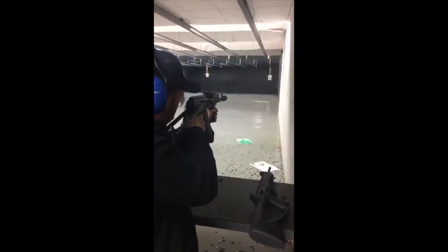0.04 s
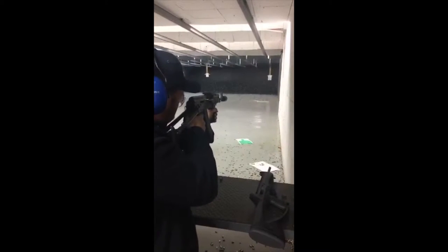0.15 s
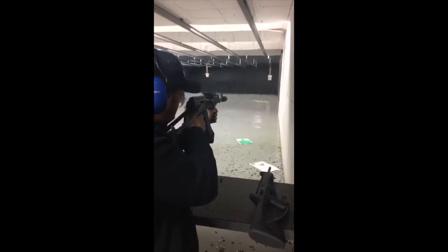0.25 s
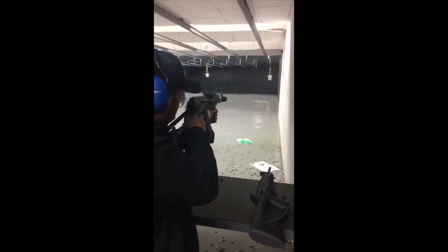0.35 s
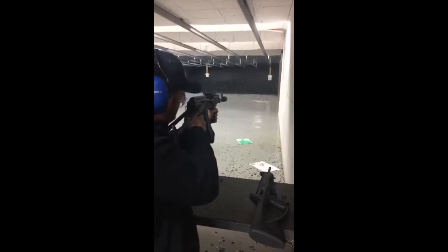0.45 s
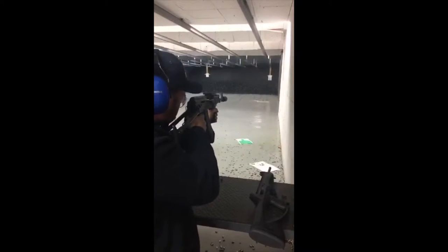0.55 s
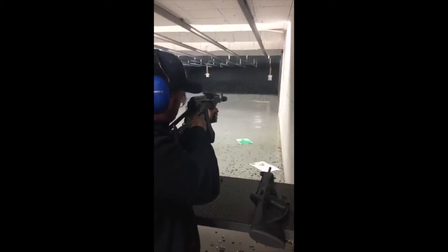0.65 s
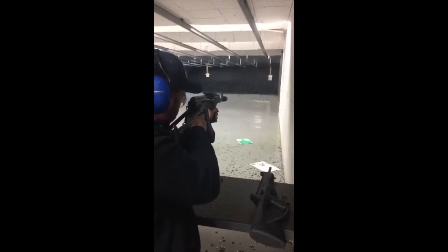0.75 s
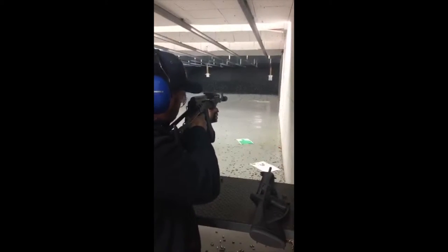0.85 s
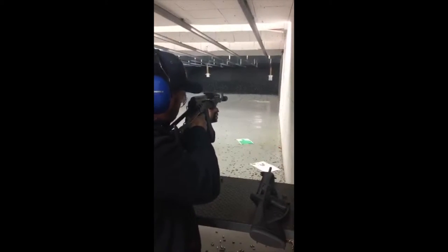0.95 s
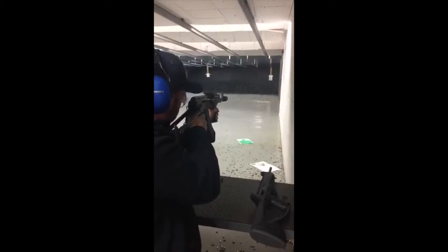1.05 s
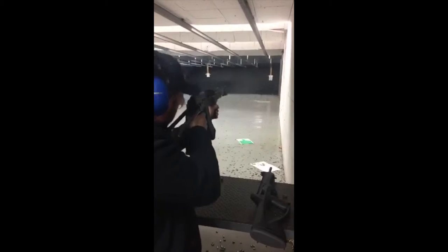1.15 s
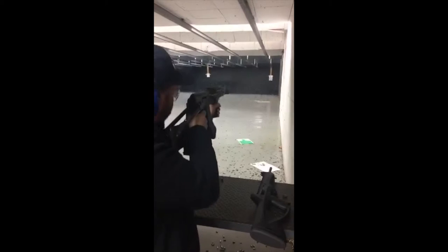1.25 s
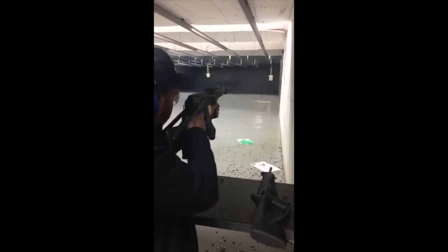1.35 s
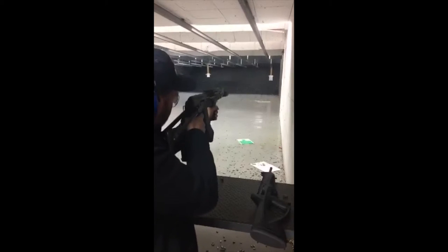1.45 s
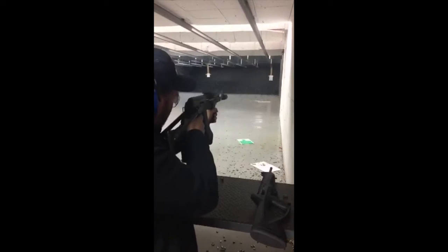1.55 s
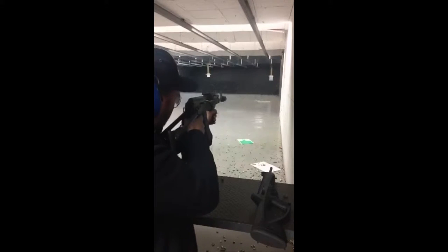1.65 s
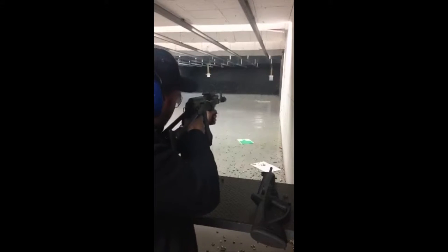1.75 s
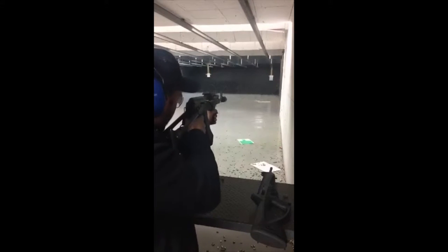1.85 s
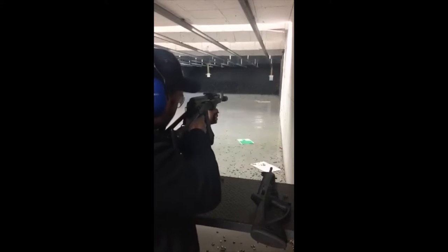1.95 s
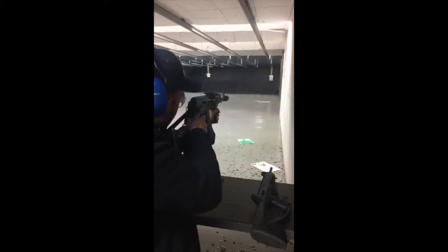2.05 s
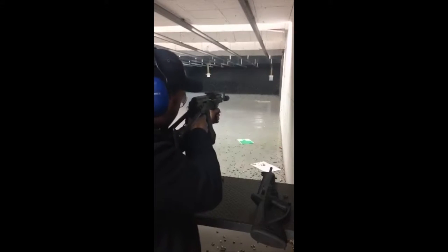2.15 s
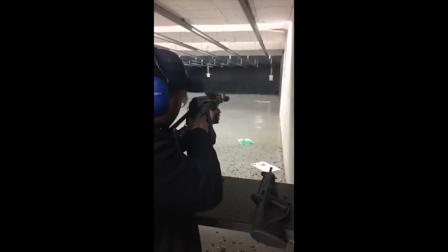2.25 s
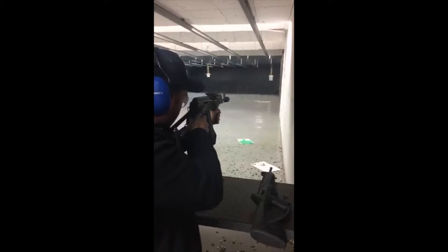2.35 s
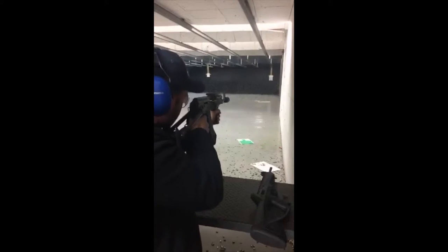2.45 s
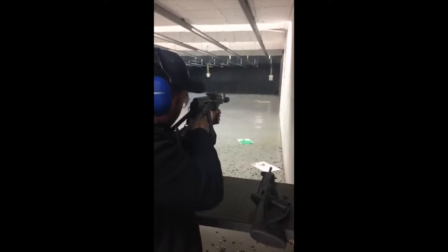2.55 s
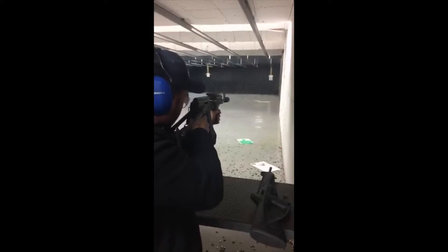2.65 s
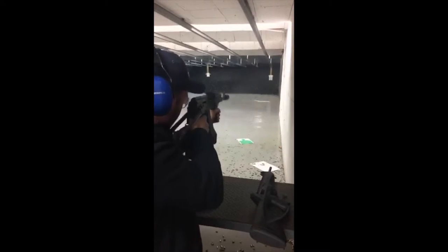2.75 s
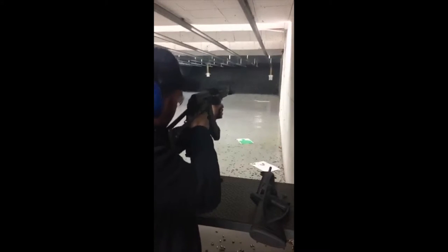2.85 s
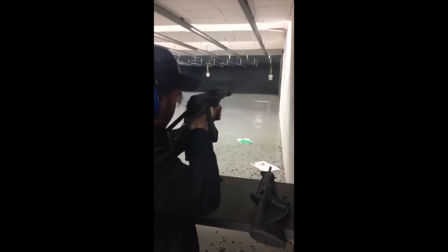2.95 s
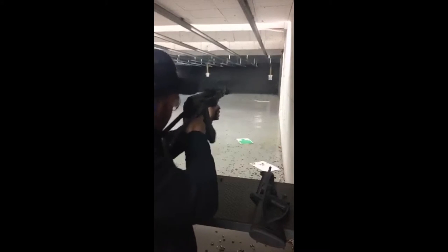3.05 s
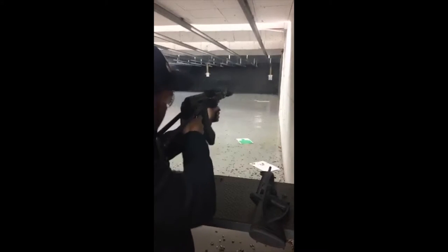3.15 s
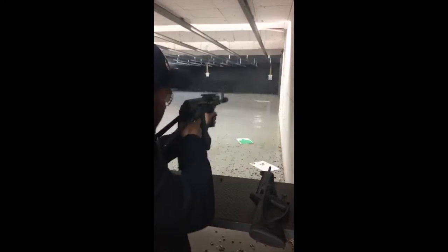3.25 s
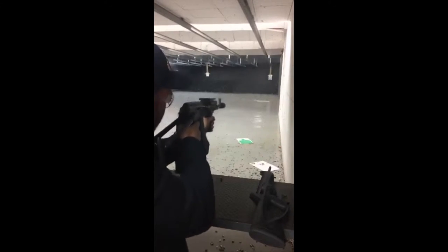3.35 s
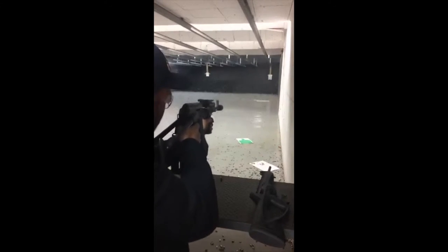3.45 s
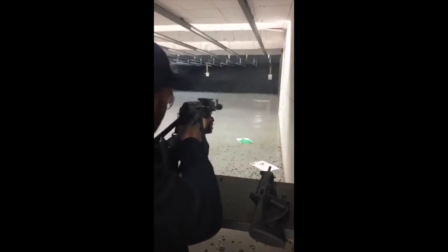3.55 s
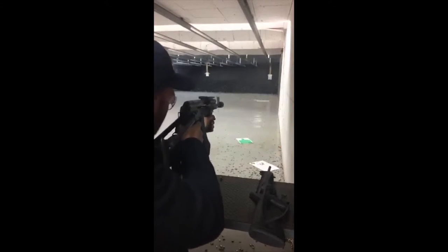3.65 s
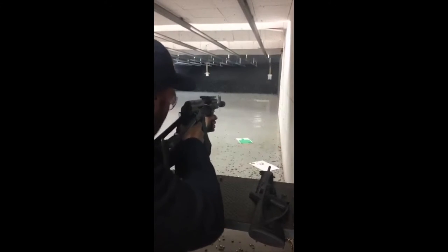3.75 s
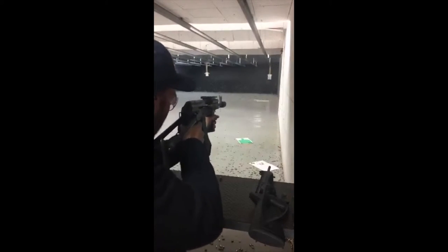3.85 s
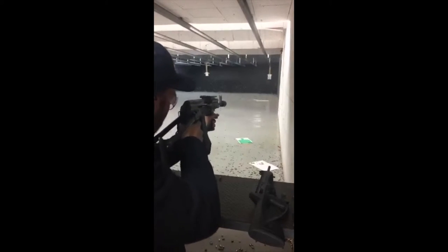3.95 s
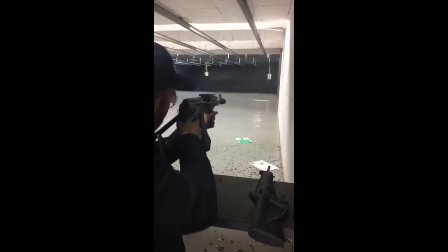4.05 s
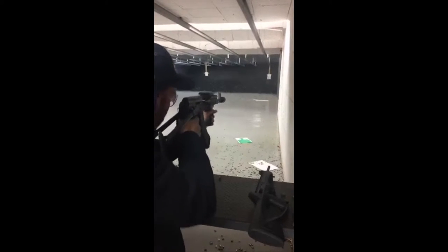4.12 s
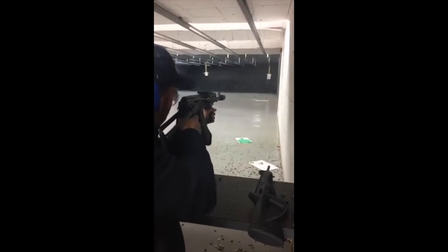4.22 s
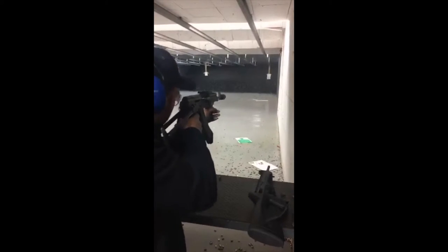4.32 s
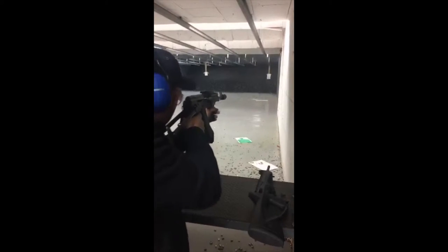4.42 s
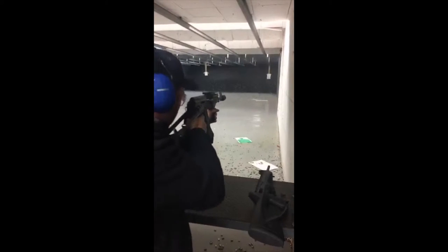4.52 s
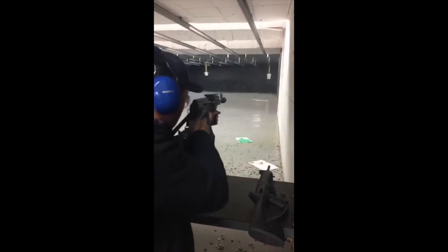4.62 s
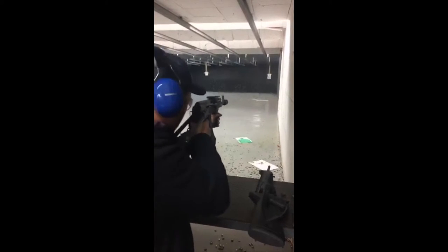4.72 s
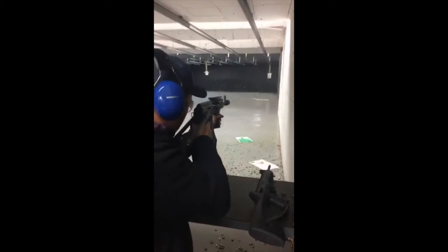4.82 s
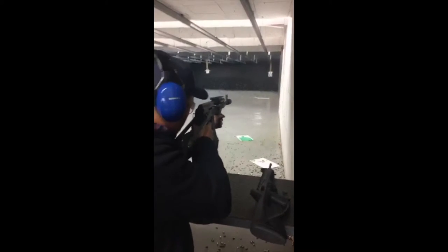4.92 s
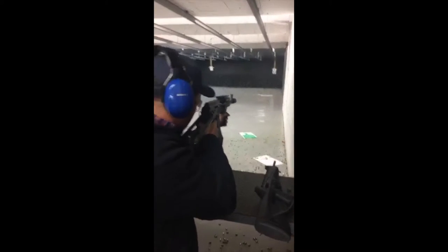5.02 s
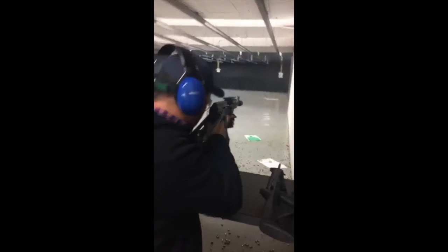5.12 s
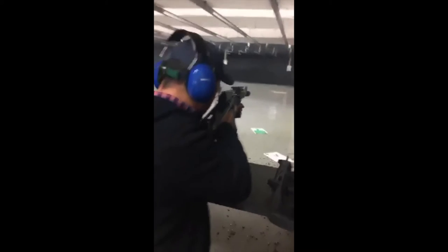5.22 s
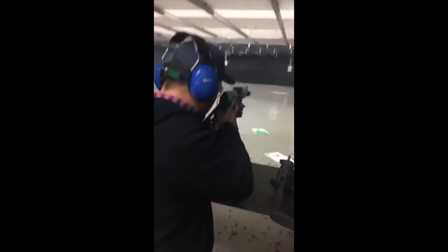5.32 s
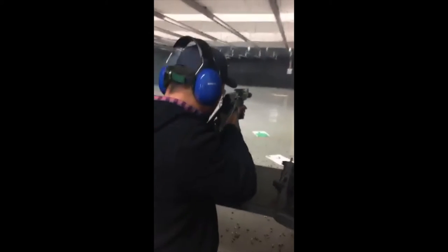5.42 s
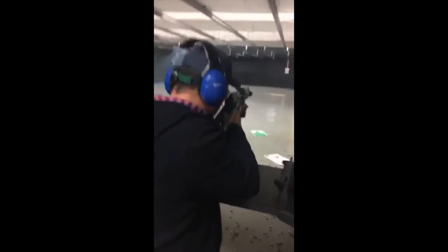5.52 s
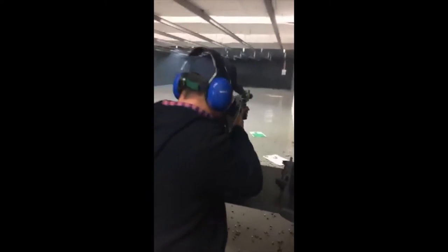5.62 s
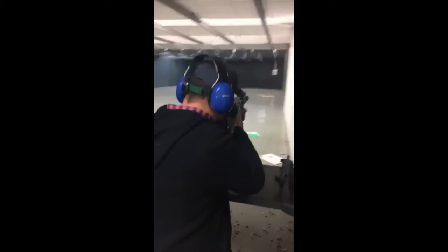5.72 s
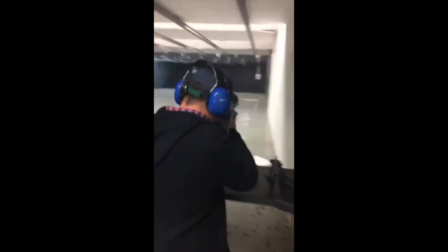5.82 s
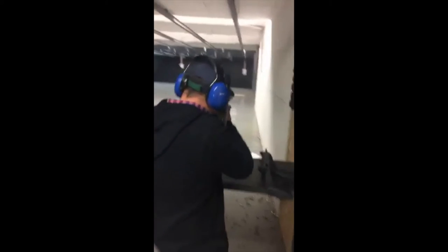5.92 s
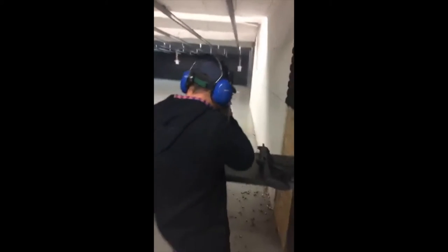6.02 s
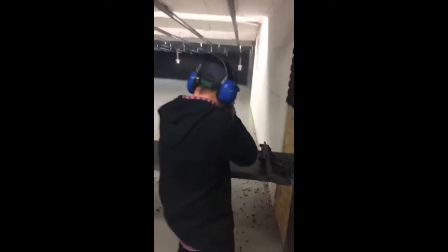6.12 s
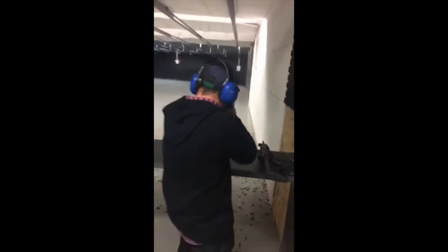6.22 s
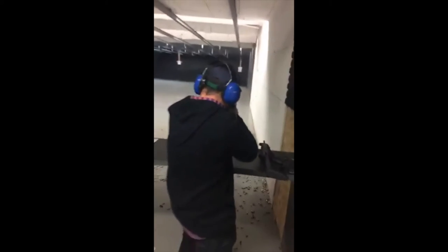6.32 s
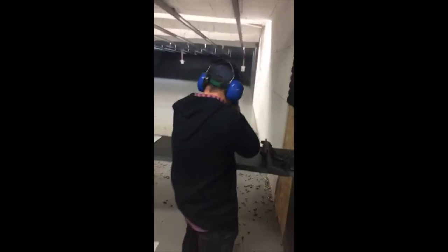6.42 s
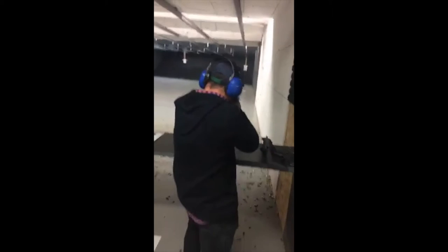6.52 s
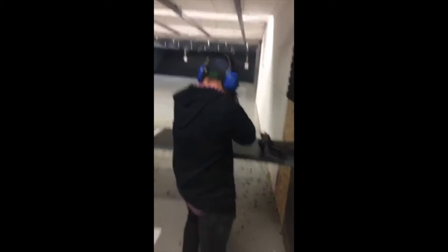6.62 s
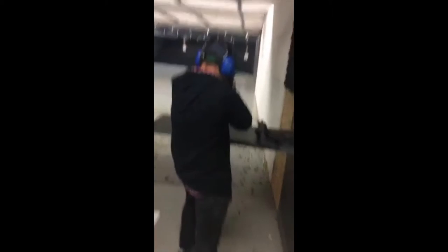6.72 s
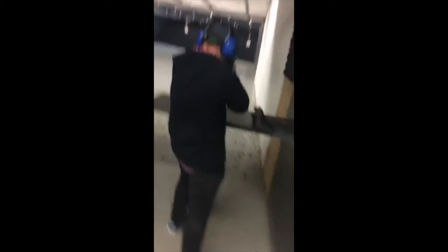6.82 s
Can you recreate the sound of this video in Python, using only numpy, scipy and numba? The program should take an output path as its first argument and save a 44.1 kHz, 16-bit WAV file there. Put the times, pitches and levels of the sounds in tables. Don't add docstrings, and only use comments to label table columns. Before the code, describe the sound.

Ventilation rumbles and hisses throughout a long hard-walled hall. A single rifle crack swells into dense reverberation, then a pair about a quarter second apart hits harder, squashed and crackling as the phone's limiter overloads. The background dips as each echo dies, then returns. A metal case clatters close by and light ticks trail off, with the treble patchy and watery from noise reduction.

```python
import sys
import numpy as np
from scipy import signal
from scipy.fft import rfft, irfft, next_fast_len
from scipy.io import wavfile
from scipy.ndimage import uniform_filter1d
from numba import njit

SR = 44100
rng = np.random.default_rng(int(sys.argv[2]) if len(sys.argv) > 2 else 0)


def undo_db(level):
    steps = np.asarray(level, float) / 20
    return 10 ** steps


def to_wav(s):
    ch = np.atleast_2d(s).T
    pcm = np.round(np.clip(ch, -1, 1) * 32767)
    wavfile.write(sys.argv[1], SR, pcm.astype(np.int16))


N = 302967
T = np.arange(N) / SR
BANDS_HZ = 22 * 2 ** (np.arange(35) / 4)

# start in seconds, blast level in dB, brightness in dB,
# delay of the wall slap in seconds, treble ring as a ratio to the hall's usual.
SHOTS = [
    (1.203, -12, 2.17, 0.03, 0.83),
    (2.836, -3.5, -0.2, .036, 1.18),
    (3.103, 2.5, 0.5, 0.032, 0.86),
]
# start in seconds, peak level in dB, ring pitch in Hz, T60 in seconds.
TICKS = [(.172, -30.5, 5800, 0.083), (1.192, -26, 5300, 0.078), (1.957, -37, 6400, .07),
         (1.963, -34.5, 6700, .07), (2.825, -22, 4920, .11), (3.9441, -28.5, 4400, 0.13),
         (3.982, -31, 4970, 0.07), (4.309, -30, 3480, 0.04), (4.469, -30.5, 6500, 0.046),
         (4.592, -40, 5209, .05), (4.867, -30.5, 5800, 0.049), (4.882, -39, 3600, .05),
         (4.993, -37, 5027, .05), (5.090, -41, 5030, .05)]
# start in seconds, peak level in dB, ring pitch in Hz,
# bandwidth in Hz, T60 in seconds.
KNOCKS = [
    (1.2021, -8, 2000, 4500, .07),
    (3.9442, -22.5, 7260, 884, 0.037),
    (3.982, -16.5, 1750, 1900, 0.081),
    (3.987, -18, 1300, 1300, .06),
]
# start in seconds, step in dB, recovery in seconds.
LET_GO = [
    (1.548, -2, 0.38),
    (3.423, -5.5, 0.4),
]


def on_log(hz, table):
    f, v = np.transpose(table)
    return np.interp(np.log(hz), np.log(f), v)


def band(hz, width, n=N):
    size = next_fast_len(n)
    f = np.arange(size // 2 + 1) * SR / size
    bell = np.exp(-((f - hz) / width) ** 2 * 2)
    x = irfft(rfft(rng.standard_normal(size)) * bell, size)[:n]
    return x / np.std(x)


def walk(rate):
    hold = int(SR / rate)
    x = np.repeat(rng.standard_normal(N // hold + 1), hold)
    x = uniform_filter1d(uniform_filter1d(x, hold), hold)[:N]
    return x / np.std(x)


def fans():
    # frequency in Hz, density in dB per Hz.
    roar = [(20, -14), (60, -8.5), (110, -3.5), (180, -5.5), (300, -9), (410, -16), (600, -14.5),
            (950, -15), (1150, -18.5), (2100, -18), (2600, -25), (3400, -29.5), (4500, -32.5),
            (7000, -38.5), (8200, -51.5)]
    # pitch in Hz, bandwidth in Hz, level in dB against the roar.
    drone_hz, drone_width_hz, drone_db = (176.4, 8.5, -8)
    # time in seconds, share of the change.
    step_back = [(0, 0.25), (3.5, -0.087), (4.4, -0.23), (5.2, -0.16), (5.6, 1.42), (6.87, 0.99)]
    # frequency in Hz, change in dB.
    back_colour = [(60, 0.5), (175, -0.5), (260, -5), (420, 3.5), (700, 0.5), (2000, -0.5), (5000, 1)]

    duck = sum(np.exp(-((T - s - 0.21) / 0.21) ** 2) for s, *_ in LET_GO)
    level_db = -28 - 4.5 * duck
    treble_db = -1 + 0.15 * walk(0.89) - 2 * duck
    bands_db = on_log(BANDS_HZ, roar) + 10 * np.log10(BANDS_HZ)
    bands_db -= 10 * np.log10(np.sum(undo_db(2 * bands_db)))
    back = np.interp(T, *np.transpose(step_back))
    swell = walk(4.6)
    out = undo_db(drone_db - 7.2 * back + 2.3 * walk(5.3)) * band(drone_hz, drone_width_hz)
    for hz, band_db in zip(BANDS_HZ, bands_db):
        db = band_db + back * on_log(hz, back_colour)
        db = db + 0.5 * swell + 1.55 * walk(8.3) + treble_db * min(hz / 3000, 1)
        out += undo_db(db) * band(hz, 0.24 * hz)
    return undo_db(level_db) * out


def ticks():
    out, t = np.zeros(N + SR), np.arange(SR // 4) / SR
    attack = np.minimum(t / 0.00028, 1)
    wide_ticks = [(s, db, hz, 6500, t60) for s, db, hz, t60 in TICKS]
    for s, db, hz, width_hz, t60 in wide_ticks + KNOCKS:
        ring = undo_db(db - 5.5 - 60 * t / t60)
        impact = undo_db(db - 10 - 60 * t / 0.0086)
        i = int(s * SR)
        out[i:i + len(t)] += (ring + impact) * attack * band(hz, width_hz, len(t))
    return out[:N]


def echo_envelope(hz):
    # frequency in Hz, T60 in seconds.
    hall_t60 = [(50, 0.73), (150, 1.2), (350, 1.006), (800, 0.91), (2000, 0.83), (4500, 0.7), (8000, 0.4)]
    # delay in seconds, added share, spread in seconds.
    backstop = [
        (.115, .2, 0.0094),
        (.172, 0.61, .022),
        (.245, .35, .02),
        (.29, 0.16, 0.011),
    ]
    # time in seconds, change in dB, centre in Hz, spread in seconds.
    surges = [(1.26, -2.5, 7000, .04), (1.49, -1.5, 3000, 0.043), (2.87, 1, 1000, 0.034),
              (2.95, 2.5, 900, .03), (3.12, 1, 300, .02), (3.48, 0.5, 2500, 0.047), (1.29, 1.5, 380, 0.032),
              (1.365, 2.5, 2500, 0.027), (1.47, -1, 800, .015), (1.51, 5, 169, 0.038),
              (2.915, 3, 350, 0.024), (2.921, 3, 4000, .03), (2.99, -3, 1970, 0.044), (3.07, 3, 250, .035),
              (3.08, -6.5, 6500, 0.028), (3.13, 2.5, 2000, .015), (3.29, 2, 4000, 0.018),
              (3.35, 5.5, 5000, 0.022), (3.385, 7.5, 800, 0.041)]

    coarse = T[::8]
    power = np.zeros(len(coarse))
    bass = 1 / (1 + (hz / 900) ** 2)
    build_s = 0.00057 + bass * 0.027 * (300 / hz) ** 0.23
    for s, db, bright_db, slap_s, ring in SHOTS:
        t = np.clip(coarse - s, 0, None)
        rise = 0.22 * (1 - 0.58 * bass)
        rise = rise + 0.45 * (1 - np.exp(-t / build_s)) ** (1 + 2 * bass)
        slap = 1 + 2.2 * (1 - bass) * np.exp(-((t - slap_s) / 0.015) ** 2)
        for late_s, share, spread_s in backstop:
            slap += share * (1 - bass) * np.exp(-((t - late_s) / spread_s) ** 2)
        t60 = on_log(hz, hall_t60) * ring ** min(hz / 5000, 1)
        decay = undo_db(db + (8 - bass) * bright_db - 60 * t / t60)
        power += (decay * rise * slap * (t > 0)) ** 2
    surge_db = 0
    for s, db, at_hz, spread_s in surges:
        surge_db = surge_db + db * np.exp(-((coarse - s) / spread_s) ** 2 - np.log2(hz / at_hz) ** 2)
    return np.interp(T, coarse, np.sqrt(power) * undo_db(surge_db))


def shots():
    # frequency in Hz, density in dB per Hz.
    hall = [(24, -55.5), (40, -6), (150, -1), (265, 0), (347, 4.5), (415, -1.5), (677, -4.5), (900, -11.5),
            (1800, -14.5), (1970, -16), (2160, -14.5), (6860, -15.5), (8200, -23.5), (10700, -63),
            (18000, -120)]
    # pitch in Hz, bandwidth in Hz, level in dB.
    hall_modes = [(178, 46, -14.5), (221.5, 15, -5.5), (292, 53, -15), (332, 47, -5.5), (668, 30, -20)]

    out = np.zeros(N)
    chop = walk(27.96)
    for hz in BANDS_HZ[2:]:
        db = on_log(hz, hall) + 10 * np.log10(hz / 300) - 7
        db = db + 1.35 * walk(18) + 1.2 * chop * min(hz / 2000, 1)
        out += undo_db(db) * echo_envelope(hz) * band(hz, 0.18 * hz)
    for hz, width_hz, db in hall_modes:
        out += undo_db(db) * echo_envelope(hz) * band(hz, width_hz)
    return out


def scene():
    return (shots() + ticks() + fans())[None]


@njit
def follow(x, attack, release):
    y, e = np.empty(len(x)), 1e-4
    for i in range(len(x)):
        e += (abs(x[i]) - e) * (attack if abs(x[i]) > e else release)
        y[i] = e
    return y


def limiter(x, top=0.32, ahead=44):
    early = np.r_[x[ahead:], np.zeros(ahead)]
    level = follow(early, 1 / (0.0013 * SR), 1 / (0.024 * SR))
    gain = np.minimum(top / level, 1) ** 1.071
    for s, *_ in SHOTS:
        after = T > s
        gain *= 1 - 0.67 * after * np.exp(-((T - s) / 0.031) ** 2)
        gain *= undo_db(3.5 * after * np.exp(-((T - s - 0.035) / 0.039) ** 2))
    for s, db, recovery_s in LET_GO:
        t = np.clip(T - s, 0, None)
        gain *= undo_db(db * np.minimum(t / 0.019, 1) * np.exp(-t / recovery_s))
    return x * gain


def treble_loss(t):
    # time in seconds, added share, spread in seconds.
    lean_spells = [(2.99, .15, .05), (3.47, -.25, .06), (4.1, .4, .08), (4.26, .45, .04), (4.36, .5, .05),
                   (4.58, .35, .06), (4.75, .4, .06), (4.96, .5, .035), (5.08, .55, .06), (5.58, .4, .07),
                   (6.08, .4, .04), (6.65, .2, .05)]

    since = t - LET_GO[-1][0]
    spent = 0.25 + 0.5 / (1 + (since / 0.62) ** 4)
    lean = sum(share * np.exp(-((t - s) / spread_s) ** 2) for s, share, spread_s in lean_spells)
    volley = 0.23 * (t > SHOTS[1][0])
    return 0.14 + lean + np.where(since > 0, spent, volley)


def treble_holes(x, from_hz=1000, full_hz=3000, frame_db=3.0, cell_db=5.5):
    # start in seconds, end in seconds, change in dB, above Hz.
    hushes = [
        (3.426, 3.456, -20, 6000),
        (3.927, 3.944, -13, 2800),
        (4.857, 4.867, -22, 3500),
    ]

    size, group = 2048, 9
    f, t, z = signal.stft(np.r_[x, x[:size]], SR, "cosine", size)
    hz = f[:, None]
    usual = np.sqrt(np.abs(uniform_filter1d(np.abs(z) ** 2, size=45, axis=0)))
    cells = rng.standard_normal((len(f) // group + 1, len(t)))
    cells = (cells + 0.69 * np.roll(cells, 1, axis=1)) / 1.17
    jump_db = frame_db * (2 * rng.random(len(t)) - 1)
    jump_db = jump_db + cell_db * np.repeat(cells, group, axis=0)[:len(f)]
    reach = np.clip(np.log(hz / from_hz + 1e-9) / np.log(full_hz / from_hz), 0, 1)
    reach = reach * np.where(hz > 6900, 0.55, 1)
    threshold = 1.47 * reach * treble_loss(t) * undo_db(jump_db) * usual
    onsets = [shot[0] for shot in SHOTS] + [tick[0] for tick in TICKS + KNOCKS if tick[1] > -30]
    for onset in onsets:
        threshold *= np.abs(t - onset) > 0.02
    keep = np.clip((np.abs(z) / (threshold + 1e-12) - 1) * 4, 0.015, 1)
    edge_hz = np.where(rng.random(len(t)) < 0.2, 8150, 7750)
    loud = np.sum(np.abs(z) ** 2, axis=0) > undo_db(-46)
    keep *= (hz < edge_hz) | loud
    x = signal.istft(z * keep, SR, "cosine", size)[1][:N]
    for start, end, db, above_hz in hushes:
        treble = signal.sosfiltfilt(signal.butter(4, above_hz, "high", fs=SR, output="sos"), x)
        cut = (1 - undo_db(db)) * ((T > start) & (T < end))
        x = x - uniform_filter1d(cut, size=44) * treble
    return x


def crackle(x):
    # time in seconds, level in dB.
    peaks = [(.0004, -46.5), (1.229, -63.5), (1.243, -48), (1.321, -42), (1.329, -43.5), (1.49, -52.5),
             (2.8635, -30.5), (2.868, -35), (2.8735, -39.5), (2.877, -38), (2.882, -47), (2.893, -41),
             (2.909, -39.5), (2.913, -47), (2.925, -44.5), (2.9657, -39), (3.048, -61.5), (3.073, -58.5),
             (3.0993, -50.5), (3.119, -37), (3.127, -34.5), (3.142, -40), (3.1625, -51), (3.262, -43.5),
             (3.3908, -39.5)]

    s, db = np.transpose(peaks)
    at = (s * SR).astype(int)
    ragged = np.c_[np.ones(len(at)), 0.35 * rng.standard_normal((len(at), 15))]
    depth = np.sign(x[at]) * undo_db(db + 12)
    x[at[:, None] + np.arange(16)] -= depth[:, None] * ragged
    return np.clip(x, -0.56, 0.56)


def low_pass(x):
    return signal.sosfilt(signal.butter(12, 15800, fs=SR, output="sos"), x)


def record(dry):
    x = np.clip(limiter(dry[0]), -0.52, 0.52)
    x = treble_holes(x)
    x = signal.sosfilt(signal.cheby1(12, 0.5, 7880, fs=SR, output="sos"), x)
    x = crackle(x)
    return low_pass(x[None])


dry = scene()
out = record(dry)
to_wav(out)
```